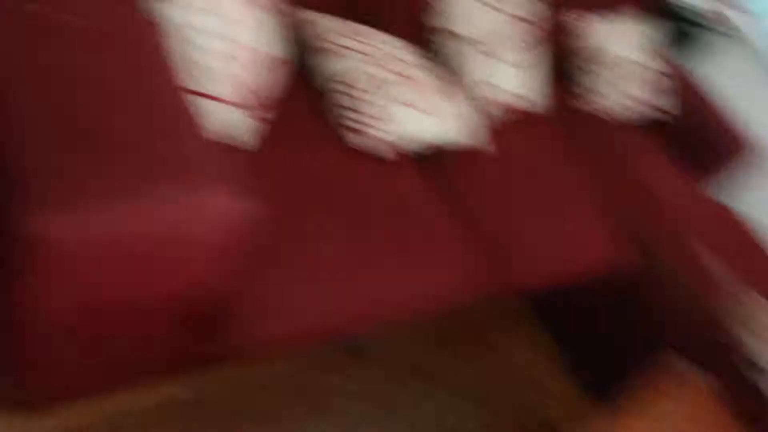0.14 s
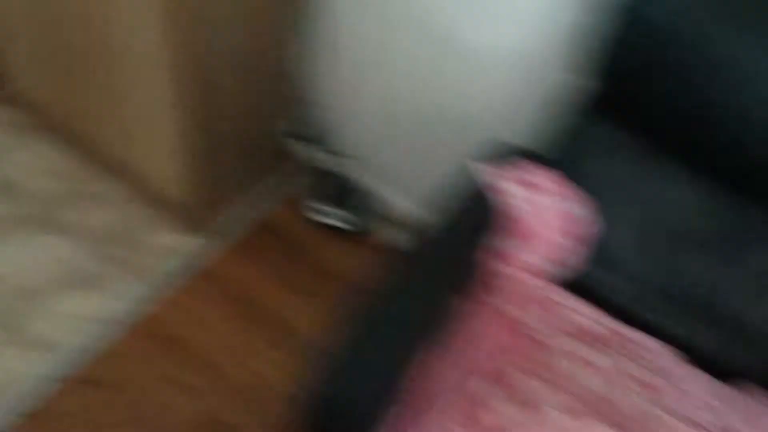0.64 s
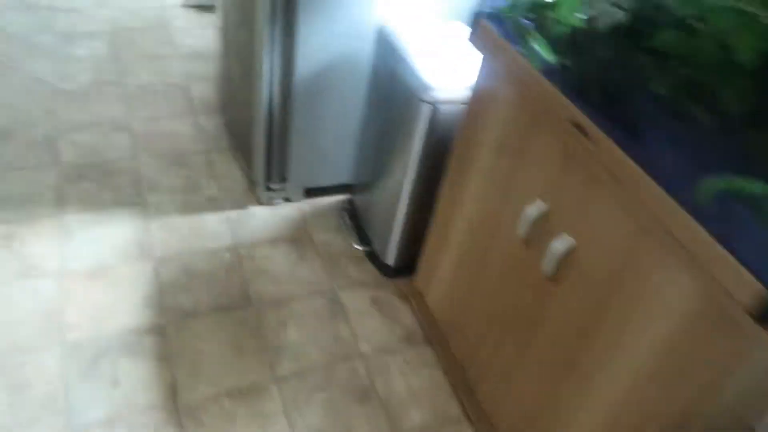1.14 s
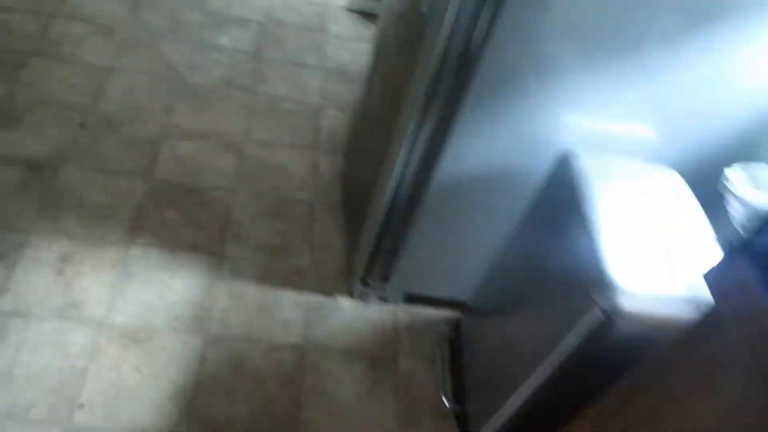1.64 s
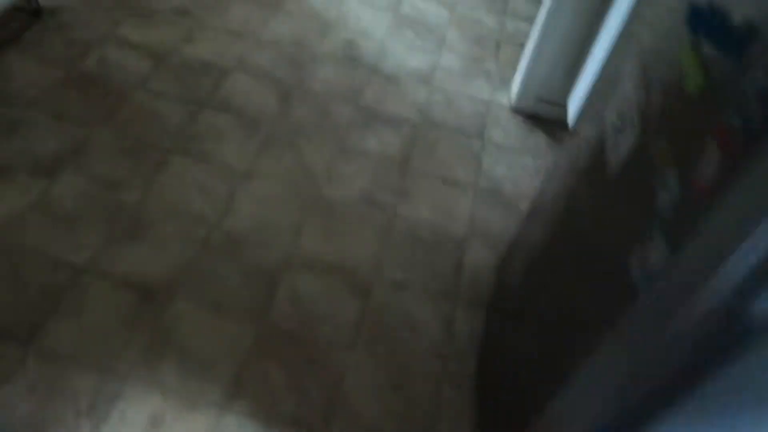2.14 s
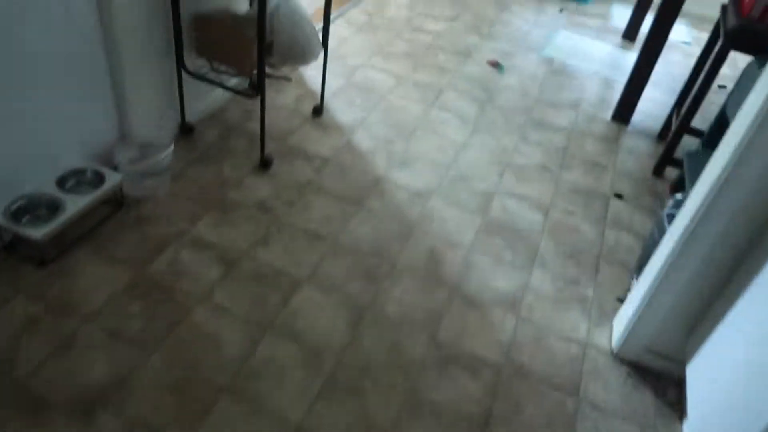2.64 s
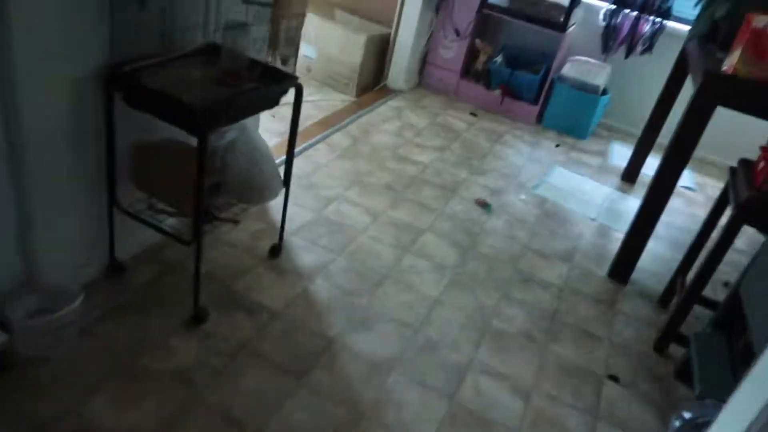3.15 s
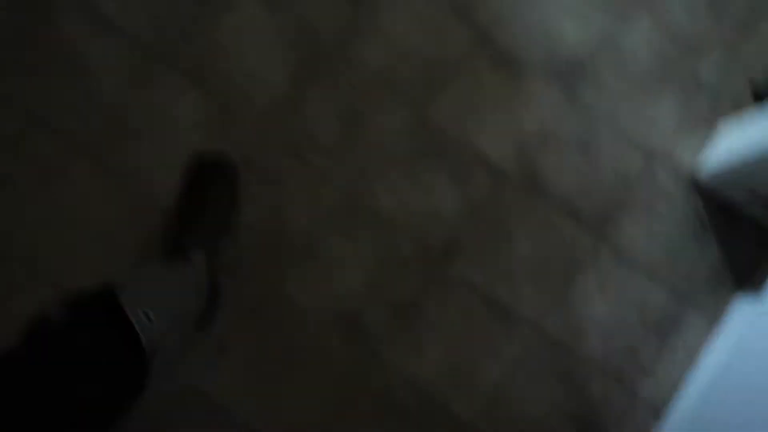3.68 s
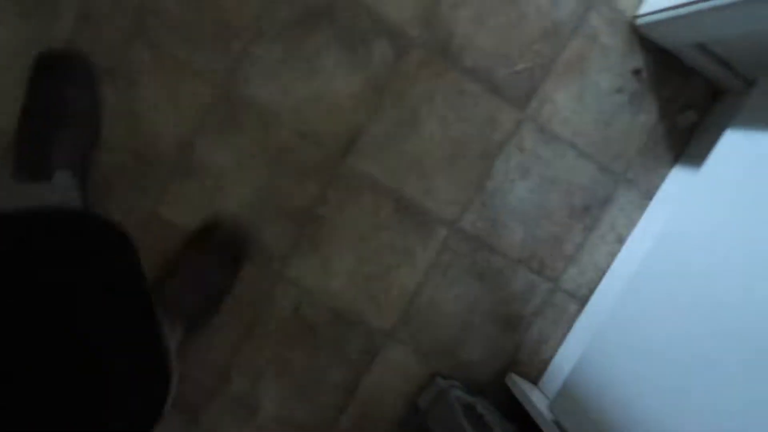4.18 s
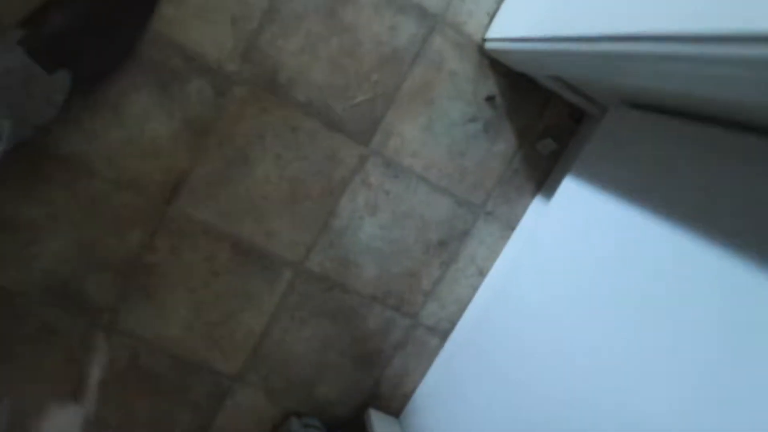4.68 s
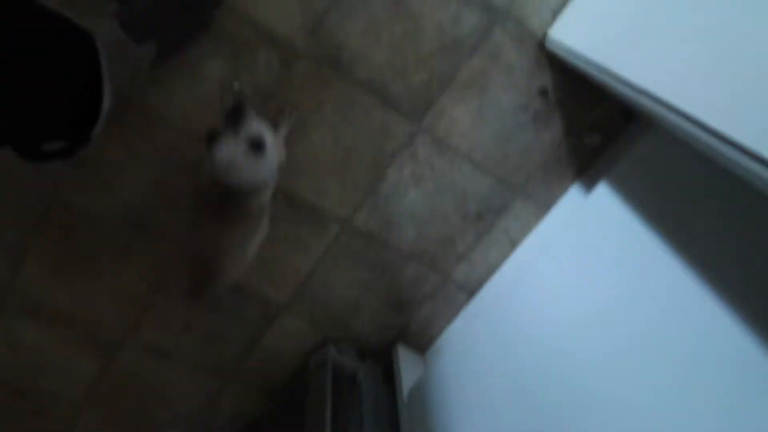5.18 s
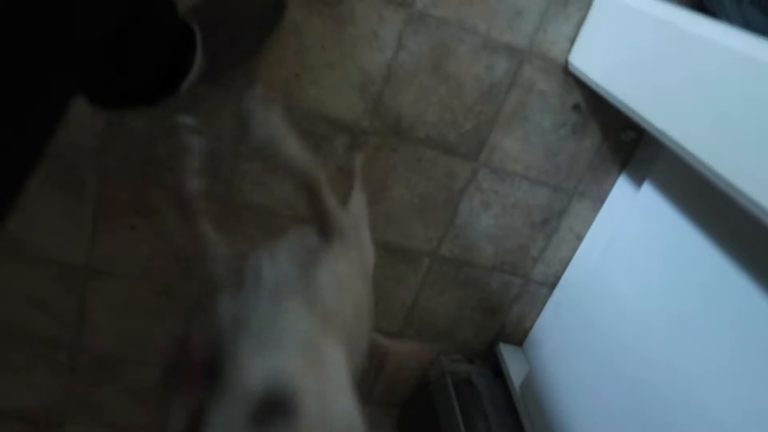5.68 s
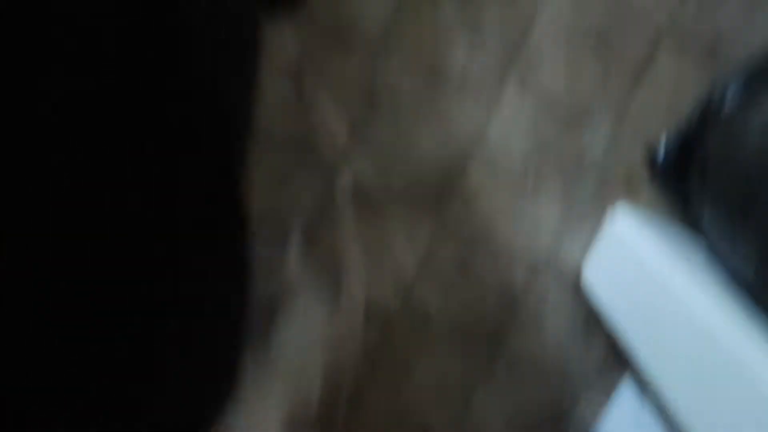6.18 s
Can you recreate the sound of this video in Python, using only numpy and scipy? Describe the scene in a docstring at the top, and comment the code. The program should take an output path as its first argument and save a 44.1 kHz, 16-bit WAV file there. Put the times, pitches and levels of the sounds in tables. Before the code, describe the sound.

Two small excited dogs in a tiled home: a far one yips sharply, a near one whines and grunts amid thuds, scuffs and claw ticks.

```python
"""Two small dogs greet their people in a tiled home.
From the start a far dog yips into the room (a clear note that breaks into a raspy one), while shaped noise
makes the shuffling, the clothes and the quiet air, and dying low notes make steps thud. Soon a near dog whines
in gliding sine partials, grainy noise makes scuffs and a few low knocks, and claws tick in short noise cracks.
Later the near dog grunts as it jumps, with overtones and puffing rasp; at the very end a groan slides down
and roughens."""
import sys
import numpy as np
from scipy import signal
from scipy.fft import rfft, irfft, next_fast_len
from scipy.io import wavfile
from scipy.ndimage import uniform_filter1d, map_coordinates

SR = 44100
rng = np.random.default_rng(int(sys.argv[2]) if len(sys.argv) > 2 else 0)


def volts_from_decibels(level):
    """Turn decibel levels (scalar or array-like) into linear amplitude factors."""
    exponent = np.asarray(level, float) / 20
    return 10 ** exponent


def persist_wave(psi):
    """Save psi, clipped to +-1, as 16-bit WAV."""
    counts = np.round(np.clip(psi, -1, 1) * 32767).astype(np.int16)
    wavfile.write(sys.argv[1], SR, np.atleast_2d(counts).T)


N = 278712  # length in samples


def unit(x):
    """Scale to rms 1."""
    return x / np.sqrt(np.mean(x ** 2) + 1e-20)


def along(points, hz):
    """Read (Hz, value) points on a log frequency axis."""
    f, v = np.transpose(points)
    return np.interp(np.log(hz + 1), np.log(f + 1), v)


def wobble(rate, size=N):
    """A smooth random curve with rate knots a second."""
    knots = rng.standard_normal(int(size * rate / SR) + 4)
    return map_coordinates(knots, [np.arange(size) * rate / SR])


def filtered(x, response):
    """Multiply the spectrum of x by a response of frequency."""
    m = next_fast_len(x.shape[-1] + 8192)
    spectrum = rfft(x, m) * response(np.fft.rfftfreq(m, 1 / SR))
    return irfft(spectrum, m)[..., :x.shape[-1]]


# How alike left and right are in sound from all sides: f/Hz, likeness (1 same, -1 opposite)
LEFT_RIGHT_LIKENESS = [(60, 1.0), (180, 1), (550, 0.98), (1650, 0.96), (4970, 0.62), (15000, -1.08)]


def diffuse(pair, colour):
    """Two unrelated noises mixed as two close microphones hear sound from all sides; rms 1."""
    def response(hz):
        turn = np.arccos(np.clip(along(LEFT_RIGHT_LIKENESS, hz), -1, .996)) / 2
        return volts_from_decibels(along(colour, hz)) * [np.cos(turn), np.sin(turn)]

    mid, side = filtered(pair, response)
    return unit(np.array([mid + side, mid - side]))


def placed(x, lag, pan_db):
    """A direct sound reaches the left microphone lag samples later and pan_db louder than the right."""
    ramp = lambda hz: np.exp(-1j * np.pi * hz * lag / SR * np.array([[1], [-1]]))
    return filtered(np.array([x, x]), ramp) * volts_from_decibels(np.array([[pan_db], [-pan_db]]) / 2)


# How long echoes take to fall by 60 dB: f/Hz, decay/s
ROOM_DECAY = [(150, 0.56), (700, 0.4), (1400, 0.5), (4000, 0.47), (8000, 0.47), (14000, 0.21)]


def room(x, gap_s):
    """Echoes follow a short gap, duller than the direct sound, each frequency dying at its own speed."""
    hz, t, z = signal.stft(rng.standard_normal((2, SR)), SR, nperseg=256)
    dying = volts_from_decibels(-60 * t / along(ROOM_DECAY, hz)[:, None])
    tail = signal.istft(z * dying, SR, nperseg=256)[1]
    tail = diffuse(tail, [(1500, -3.5), (7000, -5.0)])
    tail = np.pad(tail, ((0, 0), (round(gap_s * SR), 0)))
    return signal.fftconvolve(x[None], tail / np.linalg.norm(tail[0]), axes=1)[:, :N]


def glide(call, smooth_s, jitter):
    """Start sample, rounded pitch curve with a little jitter, its phase and the level columns as gains."""
    s, hz, *cols = np.transpose(call)
    start = round(s[0] * SR)
    t = np.arange(start, min(round(s[-1] * SR), N)) / SR
    pitch = uniform_filter1d(np.interp(t, s, hz), round(smooth_s * SR) + 1, mode="nearest")
    pitch = pitch * (1 + jitter * wobble(150, size=len(t)))
    phase = 2 * np.pi * np.cumsum(pitch) / SR
    edge = np.clip(np.minimum(t - s[0], s[-1] - t) / 0.00097, 0, 1)  # short ramps avoid clicks
    return start, pitch, phase, [edge * volts_from_decibels(np.interp(t, s, c)) for c in cols]


def voice(call, throat, tilt_db, knee_hz, jitter, shimmer_db, smear, count):
    """A fundamental, unsteady overtones weighted by the throat, and rasp that puffs once a cycle."""
    start, pitch, phase, (first, upper, rasp) = glide(call, smooth_s=0.0055, jitter=jitter)
    size = len(pitch)
    # tilt_db is per octave above the knee
    colour = lambda hz: volts_from_decibels(along(throat, hz) + tilt_db * np.log2(np.maximum(hz / knee_hz, 1)))
    flutter = lambda: volts_from_decibels(shimmer_db * wobble(164.6, size=size))
    upper = upper * volts_from_decibels(-np.maximum(pitch - 1095, 0) / 8)  # overtones dissolve at high pitch
    stack = 0
    for k in range(2, count):
        shaken = k * phase + rng.uniform(0, 2 * np.pi) + smear * k * wobble(200, size=size)
        stack = stack + flutter() * colour(k * pitch) * np.sin(shaken)
    puffs = rng.standard_normal(size) * (1 + 0.47 * np.cos(phase)) * flutter()
    tone = np.sqrt(2) * (first * np.sin(phase) + upper * stack)
    out = np.zeros(N)
    out[start:start + size] = tone + rasp * unit(filtered(puffs, colour))
    return out


YIP_ATTACK_S, BREAK_S, YIP_RELEASE_S = .014, .014, 0.011
START_DB, SAG_DB, STOP_DB = -8, 4.5, -35.5  # first instant, sag of the broken note, last instant
LATE_DB, TORN_DB = -16, -5  # overtones come late and tear apart after the break
SMOOTH_DB = -12  # the rasp is held back until the break


def yip_course(s, clear, broken, first_hz, last_hz, broken_hz, db, upper_db, broken_db, rasp_db):
    """A clear note snaps into a broken one: (t/s, f/Hz, fundamental/dB, overtones/dB, rasp/dB)."""
    snap, end = s + clear, s + clear + broken
    climb = first_hz + (last_hz - first_hz) * YIP_ATTACK_S / clear
    # t/s, f/Hz, then level/dB of the whole, fundamental, overtones, rasp
    course = [(s, first_hz, START_DB, 0, LATE_DB, SMOOTH_DB),
              (s + YIP_ATTACK_S, climb, 0, 0, LATE_DB / 2, SMOOTH_DB),
              (snap, last_hz, 0, 0, 0, SMOOTH_DB / 2),
              (snap + BREAK_S, broken_hz, 0, broken_db, 0, 0),
              (end, broken_hz, -SAG_DB, broken_db, TORN_DB, 0),
              (end + YIP_RELEASE_S, broken_hz, STOP_DB, broken_db, TORN_DB, 0)]
    return [(max(t, 0), hz, db + shape + first, db + shape + upper_db + upper, db + shape + rasp_db + rasp)
            for t, hz, shape, first, upper, rasp in course]


# Far dog's yips: t/s, clear part/s, broken part/s, first f/Hz, last clear f/Hz, broken f/Hz, level/dB
YIP_CALLS = [(-0.045, 0.023, 0.039, 880, 900, 879, -29), (0.233, 0.049, .06, 832, 1008, 1358, -28.5),
             (0.605, 0.029, 0.017, 894, 1073, 1184, -21), (1.68, 0.045, 0.025, 787, 991, 1087, -28.5),
             (2.182, .045, 0.049, 950, 974, 973.3, -25.5), (2.582, .038, .04, 1033, 1042, 1403, -18),
             (2.992, 0.027, 0.031, 953, 1082, 1380, -22.5), (4.179, 0.031, 0.031, 821, 940, 1229, -23)]
# Voice of each yip against its level: overtones/dB, fundamental of broken note/dB, rasp/dB,
# tilt above the knee/dB per octave (negative is duller)
YIP_VOICES = [(-5.5, -1.5, -1, -4), (-0.5, 6.5, 1, -1), (-10.5, -12, -13.5, -3), (-13, -2.5, -12.5, -12.5),
              (1.5, 0, 0.5, 0), (-4, 4, -5.5, 1.8), (-2, 12, -5, 3.65), (-1.5, 2.5, -5.5, 0.5)]
# Throat colour of the yips: f/Hz, level/dB
YIP_COLOUR = [(600, -10.5), (1900, 2.5), (3000, -8), (4000, 1), (5000, -2), (6200, -7), (8000, -18.5),
              (11000, -28.5), (15000, -33.5)]


def yips():
    """One voice track per yip: a tight throat sings a note, then the note breaks and rasps."""
    tracks = []
    for call, (*dbs, tilt) in zip(YIP_CALLS, YIP_VOICES):
        tracks.append(voice(yip_course(*call, *dbs), YIP_COLOUR, tilt, knee_hz=1490, jitter=0.0076,
                            shimmer_db=4.0, smear=.08, count=16))
    return tracks


# Level of the shuffling, which also drives the rumble: t/s, level/dB
SHUFFLE_LEVEL = [(0.0, -52), (0.74, -45.5), (1.2, -51), (2.92, -39.5), (3.61, -51), (3.77, -34),
                 (4.42, -54), (4.54, -30.5), (4.66, -49.5), (5.33, -39), (5.72, -54), (5.91, -38.5),
                 (6.32, -37.5)]
# Level of the cloth hiss: t/s, level/dB
CLOTH_LEVEL = [(0.0, -88.5), (0.74, -57.5), (1.2, -72.5), (2.92, -51), (3.7, -55.5), (4.42, -52),
               (4.6, -78), (5.33, -81), (5.75, -43), (5.95, -52), (6.32, -62.5)]
# Colours of rumble, shuffle, cloth and the quiet house: f/Hz, level/dB (only the shape counts)
RUMBLE_COLOUR = [(25, -9), (55, 6), (95, 3), (160, 7.5), (260, -0.5), (450, -24.5)]
SHUFFLE_COLOUR = [(150, -6), (350, 7.5), (900, 1.5), (2500, -5.5), (4500, -16), (8000, -27)]
CLOTH_COLOUR = [(1500, -35), (3500, 3), (7500, 1.5), (11000, -4.5), (14500, -22.5), (17000, -44.5)]
AIR_COLOUR = [(18, -66.5), (30, -15), (129, 1.5), (716, 11), (794, 19), (10400, -65.5), (15000, -49.5)]
AIR_DB = -66.5
# the rumble's level at a middling shuffle, and how much wider it swings
CALM_DB, RUMBLE_DB, RUMBLE_GROWS = -45, -49, 1.19


def moving():
    """Lumpy noise for the rumble of steps, shuffling feet and crackly cloth, over steady still air."""
    time = np.arange(N) / SR
    noise = lambda colour: diffuse(rng.standard_normal((2, N)), colour)

    def lumpy(db, colour, lump_db, rate):
        return volts_from_decibels(db) * unit(volts_from_decibels(lump_db * wobble(rate)) * noise(colour))

    shuffle_db = np.interp(time, *np.transpose(SHUFFLE_LEVEL))
    hiss_db = np.interp(time, *np.transpose(CLOTH_LEVEL))
    rumble_db = RUMBLE_DB + RUMBLE_GROWS * (shuffle_db - CALM_DB)
    rumble = lumpy(rumble_db, RUMBLE_COLOUR, lump_db=4, rate=18)
    shuffle = lumpy(shuffle_db, SHUFFLE_COLOUR, lump_db=3, rate=25)
    cloth = lumpy(hiss_db, CLOTH_COLOUR, lump_db=3.5, rate=40)
    return rumble + shuffle + cloth + volts_from_decibels(AIR_DB) * noise(AIR_COLOUR)


# Steps and paws landing: t/s, level/dB (before the shared gain), f/Hz
LANDINGS = [(0.158, -35.5, 200.5), (1.574, -29, 220), (2.259, -17.5, 97), (2.544, -27, 110),
            (2.646, -29, 194), (2.957, -20, 147), (3.065, -28, 235), (3.382, -23.5, 142),
            (3.515, -27.5, 111), (3.769, -19, 91.2), (4.27, -28.5, 330), (4.474, -26.5, 152),
            (4.538, -17.5, 203.5), (5.119, -25.5, 70.0), (5.259, -25.5, 165), (5.394, -24.5, 298.5),
            (5.948, -18.5, 123.5), (6.046, -23, 240)]


def thuds():
    """Soft contact: the floor's dull note, with a lower and a higher neighbour, swells briefly and dies."""
    out, t = np.zeros(N + SR), np.arange(SR // 3) / SR
    tone = lambda hz: np.sin(2 * np.pi * hz * t)
    for s, db, hz in LANDINGS:
        ring = tone(hz) + 0.41 * tone(.63 * hz) + 0.6 * tone(1.7 * hz)
        swell = 1 - np.exp(-t / 0.0068)
        out[round(s * SR):][:len(t)] += volts_from_decibels(db + 4.5 - 60 * t / 0.067) * swell * ring
    return out[:N]


def swing(turns, sudden):
    """Start sample, times and pitch: a scoop to the first turning point, then smooth swings."""
    s, hz = np.transpose(turns)
    start = round(s[0] * SR)
    t = np.arange(start, round(s[-1] * SR)) / SR
    part, leg = np.modf(np.interp(t, s, np.arange(len(s))))
    eased = np.where(leg == 0, 1 - (1 - part) ** sudden, (1 - np.cos(np.pi * part)) / 2)
    return start, t, np.interp(leg + eased, np.arange(len(s)), hz)


# Near dog's whines, pitch turning points: t/s, f/Hz
WHINE_TURNS = [
    [(0.622, 516), (0.722, 815.7), (0.82, 710.5), (0.925, 848.8), (0.955, 838)],
    [(3.918, 601), (3.985, 740), (4.065, 648), (4.098, 675)],
    [(4.1, 655), (4.13, 651.3), (4.245, 835.7), (4.415, 680.2), (4.59, 836.5), (4.68, 783)],
    [(5.642, 502), (5.715, 820), (5.726, 844)],
]
# Opening of the mouth in each whine: t/s, level/dB, second partial over fundamental/dB,
# higher partials over level/dB
WHINE_MOUTH = [
    [(0.622, -23, 1, -30), (0.69, -9.5, -23, -21.5), (0.77, -11.5, -24.5, -22), (0.82, -10, -26, -24.5),
     (0.87, -12.5, -26, -22.5), (0.93, -11.5, -16.5, -19), (0.955, -18.5, -18, -20)],
    [(3.918, -19.5, -4, -15), (3.98, -12, -14, -13.5), (4.02, -18, -30, -18.5), (4.055, -14.5, -26, -22),
     (4.098, -31.5, -20, -16)],
    [(4.1, -7.5, -11.5, -26), (4.14, -14.5, -6.5, -19.5), (4.18, -11, -2, -19.5), (4.245, -17, 3, -34),
     (4.38, -16.5, 3, -21.5), (4.48, -12, 13.5, -37), (4.51, -17, -18, -37), (4.6, -15.5, -18.5, -28.5),
     (4.65, -21, -16, -26), (4.68, -27.5, -14, -31)],
    [(5.642, -24, 3, -28), (5.66, -14.5, -6, -13.5), (5.674, -8, -21, -28), (5.703, -9, -21.5, -27.5),
     (5.726, -23, -16, -14)],
]
# Timbre of each whine: suddenness of the opening scoop (exponent), throat dip/dB (negative lifts),
# fourth partial/dB, sixth partial/dB, seventh partial/dB
WHINE_TIMBRE = [(2.1, -5.5, -0.5, -12, -6), (2.2, 16, -3.5, -26.5, -13), (2.1, 10.5, -0.5, -20.5, -19),
                (3.7, 2, -21, -0.5, 3)]
# Throat colour of the whines: f/Hz, level/dB
WHINE_COLOUR = [(1500, 3), (2500, 0), (3300, -3), (4200, -17.5), (5000, -9), (5600, -37.5), (8000, -56.5)]
# Throat colour of the breath here, and of the grunts and groan below: f/Hz, level/dB
GRUNT_COLOUR = [(250, -10.5), (450, -8), (800, -0.5), (1150, -6.5), (1600, -2), (2300, -16), (3100, -20),
                (4100, -12.5), (5200, -17.5), (7000, -30.5), (10000, -72)]
WHINE_ATTACK_S, WHINE_RELEASE_S = 0.0043, 0.004
DIP_HZ, DIP_WIDTH_HZ = 2644, 470
PUFF_DB, PUFF_S = 15, 0.034  # each whine opens with a breathy puff


def whines():
    """Clean sines on one gliding pitch, the higher ones weighted by the throat, with a thin breath."""
    out = np.zeros(N)
    for turns, mouth, timbre in zip(WHINE_TURNS, WHINE_MOUTH, WHINE_TIMBRE):
        sudden, dip_db, fourth, sixth, seventh = timbre
        start, t, pitch = swing(turns, sudden)
        pitch = pitch * (1 + .0015 * wobble(150, size=len(t)))
        phase = 2 * np.pi * np.cumsum(pitch) / SR

        s, level_db, open_db, edge_db = np.transpose(mouth)
        fade = np.minimum((t - t[0]) / WHINE_ATTACK_S, (t[-1] - t) / WHINE_RELEASE_S)
        level = volts_from_decibels(np.interp(t, s, level_db)) * np.clip(fade, 0, 1)
        ratio = volts_from_decibels(np.interp(t, s, open_db))
        first = level / np.sqrt(1 + ratio ** 2)  # the two lowest partials share the level
        upper = level * volts_from_decibels(np.interp(t, s, edge_db))

        stack = 0
        for k, db in enumerate((0, fourth, 0, sixth, seventh), 3):
            hz = k * pitch
            dip = dip_db * np.exp(-((hz - DIP_HZ) / DIP_WIDTH_HZ) ** 2)
            stack = stack + volts_from_decibels(along(WHINE_COLOUR, hz) - dip + db) * np.sin(k * phase)
        tone = np.sqrt(2) * (first * (np.sin(phase) + ratio * np.sin(2 * phase)) + upper * stack)

        breath = filtered(rng.standard_normal(len(t)), lambda hz: volts_from_decibels(along(GRUNT_COLOUR, hz)))
        breath_gain = volts_from_decibels(-35.5 + PUFF_DB * np.exp(-(t - t[0]) / PUFF_S)) * first
        out[start:start + len(t)] += tone + breath_gain * unit(breath)
    return out


# Paws and feet scuffing, cloth brushing, and two low knocks (at 5.069 and 5.205 s):
# t/s, level/dB, centre f/Hz, rise/s, decay by 60 dB/s
SCUFF_AND_KNOCK_EVENTS = [(1.058, -44, 3000, .004, 0.93), (1.549, -44.5, 920, 0.0033, 0.38),
                          (1.963, -48, 2750, 0.0036, 1), (2.019, -44.5, 1360, .006, 0.9),
                          (3.364, -36, 2720, 0.025, 0.92), (3.379, -39, 1030, 0.013, 0.76),
                          (5.069, -22.5, 1161, 0.0012, 0.067), (5.084, -30, 3070, 0.019, 0.38),
                          (5.205, -36, 1327, 0.0036, 0.12), (5.335, -25, 1087, 0.017, .15),
                          (5.45, -41.5, 1710, 0.02, 0.34), (5.739, -37.5, 8200, .05, 0.45),
                          (5.872, -27, 1550, 0.017, 0.2), (6.105, -32.5, 2530, 0.0073, 0.16),
                          (6.252, -30.5, 11200, 0.054, 0.58), (6.22, -32, 780, 0.045, .6)]


def scuffs_and_low_knocks():
    """Grainy noise round one resonance, swelling and dying: slow for friction, quick for a knock."""
    out, t = np.zeros((2, N + SR)), np.arange(SR // 2) / SR
    for s, db, hz, rise, t60 in SCUFF_AND_KNOCK_EVENTS:
        band = [(hz * .3, -30), (hz * .75, -9), (hz, 0), (hz * 1.3, -9), (hz * 3, -24), (hz * 8, -45)]
        grain = volts_from_decibels(0.58 * wobble(220, size=len(t)))
        grit = grain * diffuse(rng.standard_normal((2, len(t))), band)
        shape = volts_from_decibels(db - 60 * np.maximum(t - rise, 0) / t60) * np.minimum(t / rise, 1) ** 2
        out[:, round(s * SR):][:, :len(t)] += shape * grit
    return out[:, :N]


# Claws and buckles: t/s, level/dB (before trims and filters), dull part against that level/dB
CLICKS = [(1.3227, -44, -10), (2.872, -30, -25), (2.9301, -30, -28), (4.4717, -30.5, 7.5),
          (4.542, -34.5, 0), (5.2496, -18.5, -5), (5.333, -27.5, -1), (5.951, -16, -2.5), (6.0435, -13, -6),
          (6.127, -24.5, -25), (6.1397, -27.5, -27)]


def ticks():
    """A hard bright crack with a shorter rebound 6 ms later, over a duller knock of the same shape."""
    bright, dull, t = np.zeros(N + SR), np.zeros(N + SR), np.arange(SR // 20) / SR
    rebound = 1.1 * (t > .006) * volts_from_decibels(-60 * np.abs(t - .006) / 0.0065)
    shape = volts_from_decibels(-60 * t / 0.016) + rebound
    for s, db, low_db in CLICKS:
        start = round(s * SR)
        bright[start:][:len(t)] += volts_from_decibels(db - 3.5) * shape * rng.standard_normal(len(t))
        dull[start:][:len(t)] += volts_from_decibels(db + low_db + 0.5) * shape * rng.standard_normal(len(t))
    high = signal.butter(2, [2600, 11500], "band", fs=SR)
    low = signal.butter(2, [700, 3000], "band", fs=SR)
    return (signal.lfilter(*high, bright) + signal.lfilter(*low, dull))[:N]


def grunt_course(course, first_db, fade_db, rasp_db):
    """The fundamental fades on its own: (t/s, f/Hz, fundamental/dB, overtones/dB, rasp/dB)."""
    start = course[0][0]
    return [(s, hz, db + first_db - fade_db * (s - start), db, db + rasp_db) for s, hz, db in course]


# Near dog's grunts and huffs: t/s, f/Hz, level/dB
GRUNT_CALLS = [
    [(3.715, 362, -56), (3.73, 381.3, -30), (3.75, 428.2, -25), (3.775, 376.8, -21.5), (3.84, 378.4, -28.5),
     (3.89, 383, -36)],
    [(4.893, 237, -66), (4.908, 277, -35.5), (4.93, 390, -21), (4.948, 411, -24), (4.968, 405, -25.5),
     (4.994, 341, -34)],
    [(4.998, 239, -44), (5.015, 245.5, -28), (5.04, 257, -37.5), (5.09, 202, -46.5), (5.11, 197, -43)],
    [(6.112, 227, -55), (6.128, 214, -22.5), (6.152, 192, -28), (6.172, 187, -56)],
]
# Voice of each grunt against its level: fundamental/dB, its fade/dB per s (negative grows), rasp/dB,
# tilt above the knee/dB per octave (negative is duller)
GRUNT_VOICES = [(4, 301, -4.5, -4), (-3.5, 65, -4.5, 1), (-1, -31, -10, -2), (-11.5, -200, -8, -49)]


def grunts():
    """Short low voice sounds of the jumping dog: unsteady overtones and puffing rasp."""
    out = np.zeros(N)
    for call, (*dbs, tilt) in zip(GRUNT_CALLS, GRUNT_VOICES):
        out += voice(grunt_course(call, *dbs), GRUNT_COLOUR, tilt, knee_hz=500, jitter=.018,
                     shimmer_db=4.5, smear=.15, count=19)
    return out


# A groan sliding down and roughening: t/s, f/Hz, fundamental/dB, overtones/dB, rasp/dB
GROAN_COURSE = [(6.178, 585, -54, -61, -90), (6.2, 493.4, -30, -57, -66), (6.235, 322.2, -28.5, -53, -56),
                (6.255, 239, -28.5, -41, -31), (6.32, 129, -24.5, -43, -27.5)]


def groan():
    """The pitch slides down while the rasp comes up towards the fundamental."""
    return voice(GROAN_COURSE, GRUNT_COLOUR, tilt_db=-12, knee_hz=480, jitter=0.016,
                 shimmer_db=5.5, smear=.15, count=19)


def scene():
    """Each far yip rings in its own freshly drawn room echo; the near dog is mostly direct sound."""
    calls = yips()
    echoes = sum(room(call, gap_s=.006) for call in calls)
    far = volts_from_decibels(-0.5) * placed(sum(calls), lag=1.74, pan_db=-1.0) + volts_from_decibels(-3) * echoes
    dog = whines() + grunts() + groan()
    near = placed(dog, lag=-1.1, pan_db=0.5) + volts_from_decibels(-12.5) * room(dog, gap_s=.008)
    contacts = placed(ticks(), lag=.6, pan_db=.1) + thuds()
    contact_echoes = volts_from_decibels(-3.5) * room(contacts[0], gap_s=.005)
    return far + near + contacts + contact_echoes + scuffs_and_low_knocks() + moving()


def roll_off(x):
    """The treble ends steeply here."""
    return signal.sosfilt(signal.butter(12, 16470, fs=SR, output="sos"), x)


def record(dry):
    """Turn the finished mix into the sound that is written out."""
    return roll_off(dry)


dry = scene()
out = record(dry)
persist_wave(out)
```